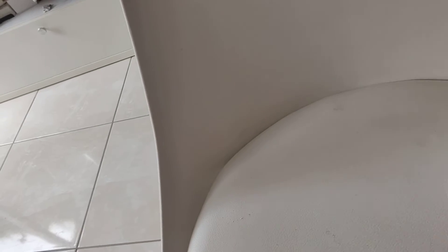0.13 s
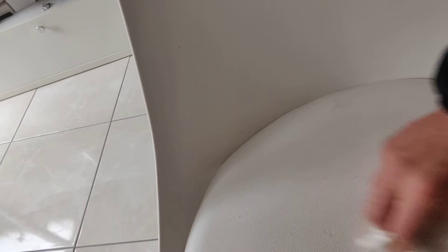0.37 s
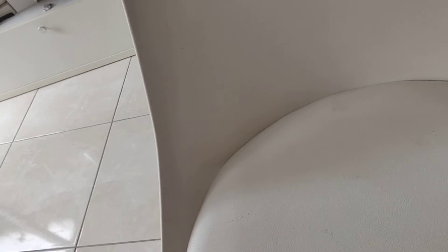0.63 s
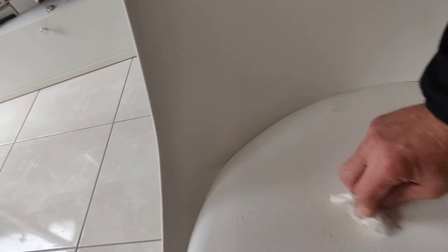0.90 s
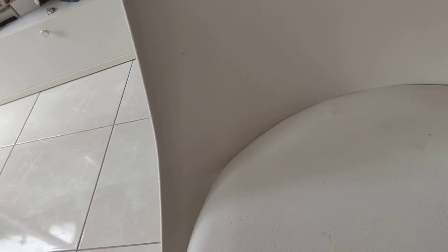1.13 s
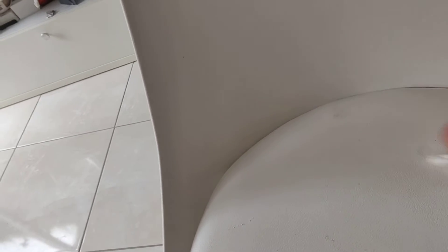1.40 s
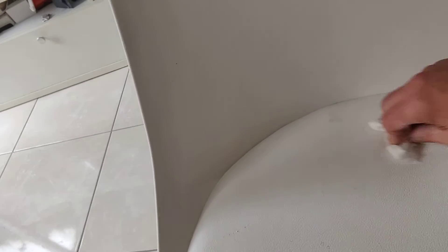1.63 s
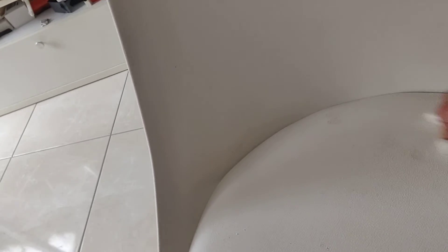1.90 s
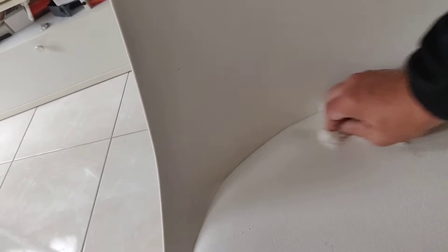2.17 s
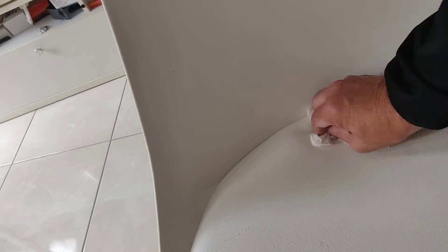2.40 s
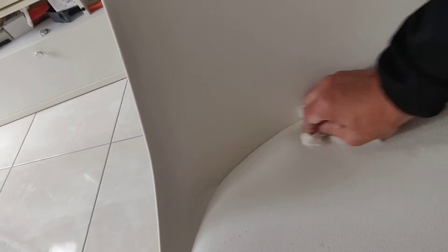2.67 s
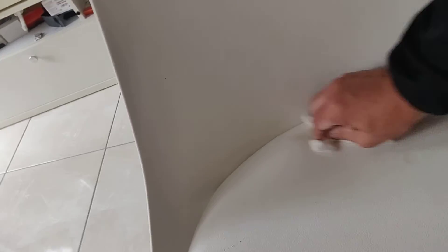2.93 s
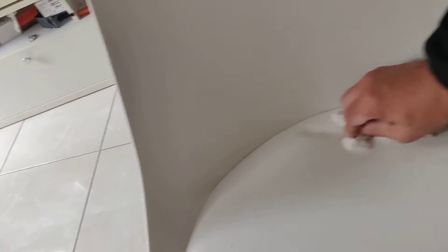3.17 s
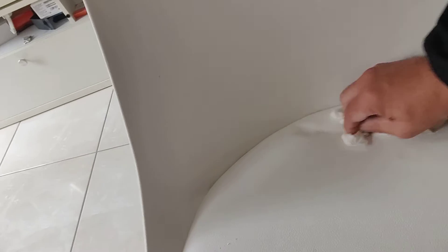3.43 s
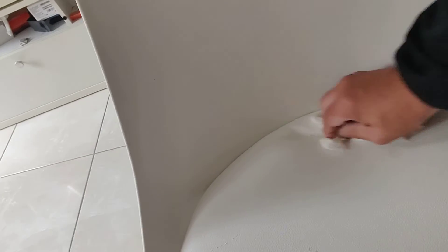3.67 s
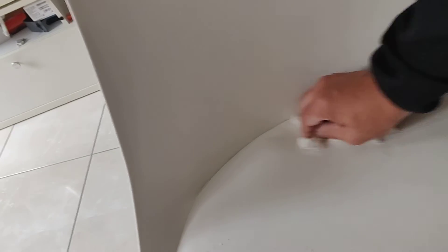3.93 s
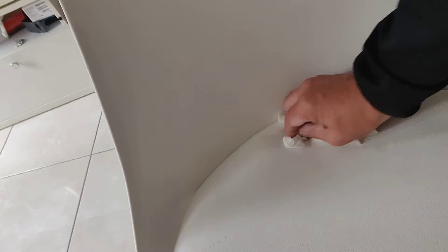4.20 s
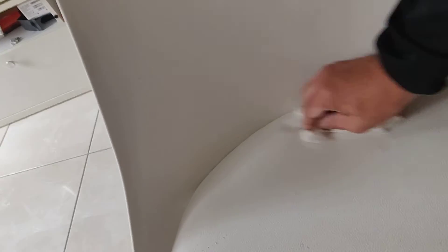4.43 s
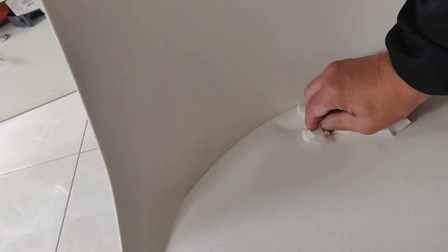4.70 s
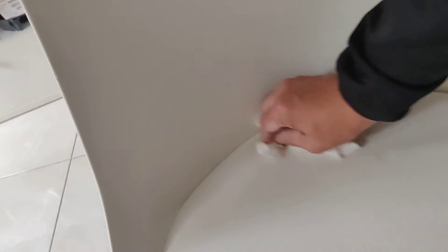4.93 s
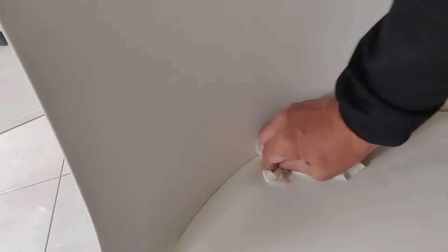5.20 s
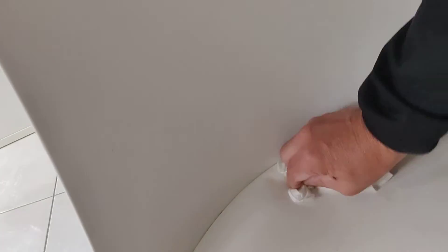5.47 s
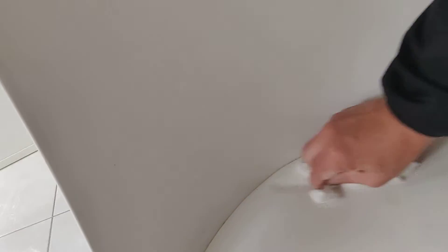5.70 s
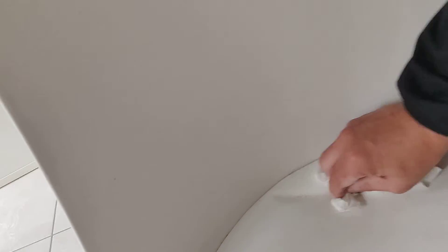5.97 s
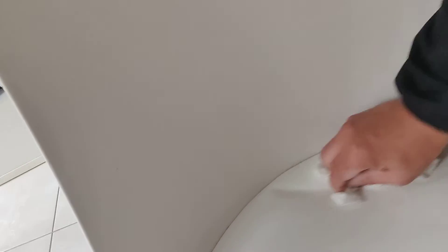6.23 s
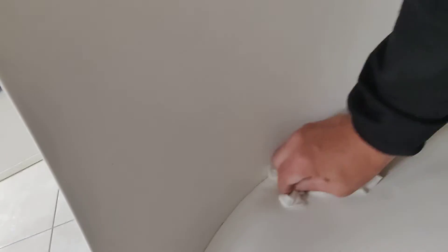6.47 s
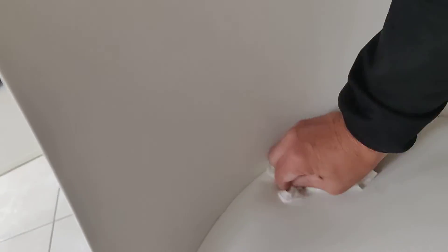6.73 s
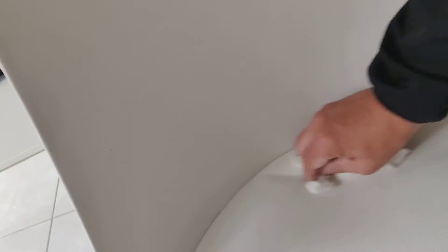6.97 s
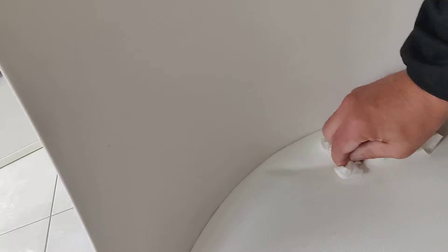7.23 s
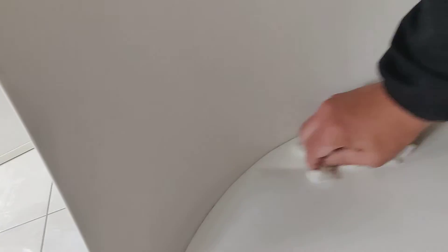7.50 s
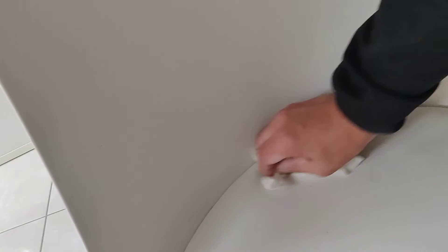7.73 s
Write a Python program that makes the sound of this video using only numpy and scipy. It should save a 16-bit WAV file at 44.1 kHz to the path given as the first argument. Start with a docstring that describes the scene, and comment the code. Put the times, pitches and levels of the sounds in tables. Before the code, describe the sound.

A cloth scrubs quickly back and forth over a padded chair seat, rasping and hissing, while the chair knocks and rattles in a tiled room.

```python
"""In a tiled room, a cloth is scrubbed to and fro over a padded chair seat, close to a two-port microphone.
Each stroke swells and dies with the speed of the hand: grainy rasp and fine hiss are shaped noise.
The chair shakes and knocks in decaying sine modes, the cloth snags in bursts of clicks, and it squeaks at the end.
The hand works its way from the open seat into the crease by the backrest; tiles echo and a faint room tone lies below."""
import sys
import numpy as np
from scipy import signal
from scipy.io import wavfile
from scipy.ndimage import uniform_filter1d

SR = 44100
rng = np.random.default_rng(int(sys.argv[2]) if len(sys.argv) > 2 else 0)


def boost(x):
    """Linear amplitude factor 10**(x/20) for a level x in decibels (scalar or array-like)."""
    u = np.asarray(x, float) / 20
    return 10 ** u


def transcribe(signal):
    """Save signal, clipped to [-1, 1], as a 16-bit WAV file at the path in sys.argv[1]."""
    frames = np.atleast_2d(signal).T
    limited = np.clip(frames, -1, 1)
    pcm = np.round(limited * 32767).astype(np.int16)
    wavfile.write(sys.argv[1], SR, pcm)


N = 347022  # length in samples

# Strokes, push and pull in turn. Each row: start in seconds, fastest moment in seconds, rasp level in dB,
# level of the shaking chair in dB.
STROKES = [(-0.01, -0, -33, -44.5), (0.144, 0.325, -44.5, -80), (0.403, 0.498, -39.5, -56),
           (0.588, 0.778, -45, -72), (0.85, 0.977, -36, -72), (1.039, 1.206, -42, -56),
           (1.26, 1.37, -36, -43), (1.459, 1.601, -46, -63), (1.665, 1.74, -39.5, -42.5),
           (1.822, 1.962, -45.5, -40), (1.975, 2.136, -40, -43), (2.256, 2.349, -40, -40),
           (2.427, 2.551, -33, -42.5), (2.599, 2.635, -44.5, -38), (2.753, 2.845, -33.5, -41),
           (2.886, 2.943, -37.5, -37), (3.026, 3.134, -34.5, -26), (3.141, 3.232, -37.5, -48),
           (3.322, 3.419, -34, -31), (3.46, 3.518, -38, -51), (3.616, 3.709, -33.5, -27),
           (3.757, 3.814, -38.5, -32), (3.928, 4.017, -29.5, -30.5), (4.07, 4.105, -36.5, -32),
           (4.215, 4.321, -30, -29.5), (4.377, 4.402, -35, -37.5), (4.53, 4.663, -33.5, -44),
           (4.707, 4.78, -46, -46), (4.886, 4.983, -38.5, -35.5), (5.04, 5.16, -40.5, -48),
           (5.225, 5.315, -31.5, -38), (5.361, 5.438, -37, -46), (5.532, 5.639, -30.5, -39),
           (5.67, 5.71, -40.5, -42.5), (5.837, 5.932, -33.5, -42), (5.992, 6.023, -39, -57),
           (6.139, 6.25, -31.5, -45), (6.312, 6.349, -33.5, -43), (6.465, 6.577, -31.5, -46.5),
           (6.638, 6.67, -35, -39.5), (6.788, 6.882, -26, -41), (6.92, 6.984, -32, -40.5),
           (7.086, 7.194, -28.5, -39.5), (7.246, 7.291, -36.5, -58), (7.414, 7.545, -35.5, -49),
           (7.568, 7.685, -41, -60), (7.758, 7.84, -42, -36)]
# Knocks of the rocking chair. Each row: start in seconds, level of the middle modes in dB,
# low modes over that in dB, high modes over that in dB.
KNOCKS = [(0.177, -22.5, -19, -38), (0.432, -32.5, 6, 1.5), (0.464, -35, -15, -10.5),
          (0.622, -24.5, -20, -32), (0.892, -32, 6, 1.5), (0.934, -39, -7, -9), (1.071, -23.5, -6.5, -26),
          (1.298, -27, 3.5, 2), (1.344, -37.5, 0, 1), (1.474, -28, -3, -16), (1.691, -29, 3, 1.5),
          (1.847, -23.5, -14, -40), (2.036, -27.5, 2.5, 1), (2.27, -26.5, -6.5, -41),
          (2.302, -26, 0.5, -23), (2.411, -39.5, -5, -18), (2.618, -33.5, 2, -27),
          (2.641, -24.5, 1.5, -12.5), (2.902, -27.5, -9.5, -32), (2.933, -23.5, 0.5, -25),
          (3.039, -30.5, 1, 0), (3.195, -30, -0.5, -16), (3.22, -22, 1, -9.5), (3.335, -26, -3.5, -3),
          (3.477, -31, 1, -15), (3.508, -31.5, 5.5, -23), (3.58, -44.5, -6, 5), (3.621, -30.5, 2.5, 6),
          (3.778, -35.5, 6, -6), (3.8, -18.5, 0, -5), (3.923, -28, 4, 5.5), (4.076, -36.5, 8, -10),
          (4.116, -19.5, -5.5, -13), (4.225, -26, 1, 5.5), (4.321, -22.5, -12, -8.5), (4.372, -36, 6, -24),
          (4.414, -28.5, 6.5, -8.5), (4.544, -25.5, 0, 2), (4.737, -45, 7, -24), (4.775, -48, 13, -7),
          (4.826, -53, 11, -10), (4.901, -35, 1.5, 0), (5.008, -44.5, 9.5, -6), (5.071, -36, 1.5, -41),
          (5.235, -35, 8, 5.5), (5.392, -36.5, 0.5, -27), (5.417, -49, 13, -9), (5.532, -42.5, 4.5, -2.5),
          (5.686, -34, -3, -13), (5.71, -34, 6.5, -10), (5.838, -33.5, 4, 4.5), (5.997, -47.5, 9.5, -22),
          (6.021, -45.5, 8.5, -10), (6.151, -32, 3, 1), (6.307, -48.5, 9, -14), (6.335, -43, 12.5, 5),
          (6.483, -33.5, 1.5, 1.5), (6.644, -48.5, 9.5, -9), (6.668, -44, 9, 8.5),
          (6.736, -25.5, -29, -15.5), (6.792, -31, -3, -3), (6.964, -39.5, 7, -1.5), (7.1, -32, -0.5, 5),
          (7.424, -52.5, 6, -18), (7.6, -42, 1, -15), (7.63, -45.5, 8, 1), (7.766, -61, 8, 5),
          (7.81, -51, 13, 0), (7.843, -49, 2, 9)]
# Snags of the cloth. Each row: start in seconds, click level in dB, thud over the click in dB,
# length in ms (the time by which the slips have sunk 9 dB).
SNAGS = [(2.558, -18, -18, 1.6), (2.853, -17, -24, 1), (3.426, -19, -17, 1.1), (3.719, -15.5, 4, 2.1),
         (4.023, -26, 7, 1.2), (4.324, -7, -22, 2.3), (4.668, -12.5, -15, 1.1), (5.626, -6.5, -11, 10.3),
         (6.258, -26.5, -5, 2.2), (6.587, -13, -9, 2.1), (6.888, -18.5, 3.5, 4), (7.194, -17.5, -6, 9.6),
         (7.555, -30.5, 6, 2)]
# Modes of the chair when free to ring. Each row: frequency in Hz, relative level in dB, t60 in seconds.
LOW_MODES = [(90.7, -9.5, 0.28), (120, -7, 0.15), (155.9, 2.5, 0.084)]
MIDDLE_MODES = [(234.15, 4.42, 0.38), (266.5, 1.3, 0.19)]
HIGH_MODES = [(380.7, 10, 0.036), (531.6, 4.5, 0.045), (566, -2, 0.14), (705, -29, 0.011), (910, -8, 0.028)]
# Colour of the rasp, on the open seat and by the backrest. Each row: frequency in Hz, relative level in dB.
OPEN_RASP = [(180, -60), (300, -27), (508, -12.5), (871, -7), (1190, -11.5), (1300, -10), (2290, -10),
             (3500, -29.5), (6000, -19.5), (7800, -59), (13200, -120)]
CREASE_RASP = [(180, -18), (300, -1), (376, -2), (598, -2), (1100, -12), (1270, -5), (1940, -13.5),
               (2460, -8), (3130, -20.5), (4170, -20), (4670, -30.5), (5430, -39), (6000, -27), (7800, -70),
               (13200, -120)]
# Colour of the hiss. Each row: frequency in Hz, relative level in dB.
HISS = [(2650, -6), (4500, -8.5), (5330, -11), (5730, -7), (6350, -6), (7360, -2), (8500, -14), (9920, -19),
        (11000, -17.5), (14900, -15), (15300, -47)]
# Hiss of a push with usual rasp. Each row: time in seconds, level in dB.
HISS_LEVEL = [(0, -44.5), (.6, -45), (1.5, -46.5), (2.0, -50.5), (2.5, -45.5), (3.5, -50), (4.5, -53),
              (5.0, -53.5), (5.4, -50.5), (5.7, -53.5), (6.5, -52), (7.2, -54), (7.87, -53)]
# The hand moves about the microphone. Each row: time in seconds, hiss left over right in dB,
# rasp left over right in dB (both pans are centred on their mean), lift of the top of the hiss in dB.
PLACE = [(0.0, 0.5, 0.5, -5.5), (0.81, -2.5, 0.5, -5), (1.64, -4, 2, -4.5), (2.04, -1, -1, -4),
         (3.55, 5, 2.5, -5.8), (4.51, 2.5, 2.5, -3.5), (5.26, 11, 5, -3.5), (5.83, 6, 3, -6),
         (6.11, 5, 3, -4.5), (6.66, 10, 4, -7.5), (7.87, 4.5, -2.0, -2.5)]
# Colour of the room tone. Each row: frequency in Hz, relative level in dB.
ROOM = [(15, -79), (25, -16), (69, -6), (178, -26), (239, -1.5), (329, -12), (1230, -29), (2340, -26),
        (4710, -36.5), (7230, -34), (11100, -54), (13400, -45), (15300, -64)]
# Likeness of the two ports. Each row: frequency in Hz, left-right correlation from 0 to 1.
SAME = [(60, 0.96), (400, 1), (700, 0.95), (1000, 0.2), (1300, 0.54), (2400, 0.75), (4000, 0.08),
        (9000, 0.054), (15000, 0.27)]
# Balance of the ports. Each row: frequency in Hz, left over right on the open seat in dB, and in the crease in dB.
LEAN = [(100, 0.5, .5), (453, 3.5, 2), (900, 1, 4), (1290, 2, 3), (2270, -10.5, -8), (2910, -8, -4),
        (3330, 4.5, -1), (5000, 3, 2.5), (6430, -1.5, -2), (7340, 4.5, 7), (8350, 11.5, 13.5),
        (10460, 4, 3), (14000, -2, -4)]
# Phase lead of the left port. Each row: frequency in Hz, lead on the open seat in radians, and in the crease in radians.
LEAD = [(600, 0.3, 0.077), (826, 1, 1.46), (1004, -0.25, 1.7), (1424, -2, 3.15), (1920, -4.5, 7.8),
        (2610, -2, 7.94), (4020, -0.5, 7.3), (5730, 4, 10.2)]
# Echo decay of the tiles. Each row: frequency in Hz, t60 in seconds.
TILES = [(200, 0.057), (1000, 0.48), (4000, 0.25), (10000, 0.31)]
# Rough squeak of the dragging cloth. Each row: time in seconds, mean pitch in Hz, mean level in dB.
SQUEAK = [(7.75, 473, -58), (7.78, 509, -43.5), (7.8, 509, -52), (7.82, 561, -33), (7.87, 622, -36)]

INTO_CREASE_S = (1.73, 2.36)  # the hand leaves the open seat, and reaches the crease


def evened(x):
    """Scales to rms 1."""
    return x / np.sqrt(np.mean(x ** 2) + 1e-20)


def read(points, hz, column=1):
    """Reads a spectrum on a log-frequency axis."""
    table = np.transpose(points)
    return np.interp(np.log(hz + 1), np.log(table[0] + 1), table[column])


def add(mix, s, sound):
    """Mixes a sound in at s seconds."""
    part = mix[..., round(s * SR):][..., :sound.shape[-1]]
    part += sound[..., :part.shape[-1]]


def by_place(open_seat, crease, t):
    """Blends two settings as the hand moves from the open seat into the crease."""
    share = np.interp(t, INTO_CREASE_S, [0, 1])
    return (1 - share) * open_seat + share * crease


def noise(shape_db, patchy_db, size=512):
    """Two-port noise with drifting patches; shape_db(hz, t) colours it."""
    hop, bins = size // 4, size // 2 + 1
    frames, hz = N // hop + 5, np.fft.rfftfreq(size, 1 / SR)[:, None]
    t = np.arange(frames) * hop / SR
    a, b, c, d, patches = rng.standard_normal((frames, bins, 5)).T
    patches = uniform_filter1d(patches, size=size // 256, axis=0)
    patches = evened(uniform_filter1d(patches, size=9000 // size, axis=1))
    # the right port shares part of the left one's noise, with a phase lag
    same = np.clip(read(SAME, hz), -1, 1)
    left = a + 1j * b
    right = same * left + np.sqrt(1 - same ** 2) * (c + 1j * d)
    lead = by_place(read(LEAD, hz), read(LEAD, hz, column=2), t)
    z = np.array([left, right * np.exp(-1j * lead)])
    lean_db = by_place(read(LEAN, hz), read(LEAN, hz, column=2), t)
    ports_db = np.array([.5, -.5])[:, None, None] * lean_db
    z *= boost(shape_db(hz, t) + ports_db + patchy_db * patches)
    return evened(signal.istft(z, nperseg=size, noverlap=size - hop)[1][:, :N])


def ring(modes, length=0.87, rise_ms=0.057, chance=np.zeros((5, 2))):
    """Decaying sines, one a mode: length scales the t60, rise_ms swells them in, chance shifts pitch and phase."""
    detune = 0.018  # greatest pitch shift, as a share
    t = np.arange(SR // 3) / SR
    swell = 1 - np.exp(-(t * 1000 / rise_ms) ** 2)
    out = np.zeros(len(t))
    for (hz, db, t60), (bend, turn) in zip(modes, chance):
        sine = np.sin(2 * np.pi * (hz * (1 + 2 * detune * bend) * t + turn))
        out += boost(db - 60 * t / (t60 * length)) * sine
    return swell * out


def room_tone():
    """Steady, quiet noise of the room in its own colour."""
    return boost(-48.5) * noise(lambda hz, t: read(ROOM, hz), patchy_db=2.2, size=2048)


def tiled_room(x):
    """Sparse echoes of random sign, each band dying at its own speed."""
    taps = np.zeros((2, SR // 2))
    at = np.arange(300, SR // 2 - 20, 20) + rng.integers(0, 20, (2, (SR // 2 - 301) // 20))
    np.put_along_axis(taps, at, rng.choice([-1., 1.], at.shape), 1)
    hz, t, z = signal.stft(taps, SR, nperseg=256)
    fading = z * boost(-60 * t / read(TILES, hz)[:, None])
    tail = signal.istft(fading, SR, nperseg=256)[1]
    return signal.fftconvolve(x.mean(0)[None], tail / np.linalg.norm(tail[0]), axes=1)[:, :N]


def squeak():
    """Uneven stick-slip: a jittered pitch with a few overtones."""
    s, hz, db = np.transpose(SQUEAK)
    t, out = np.arange(s[0], N / SR, 1 / SR), np.zeros(N)
    jitter, flutter = evened(uniform_filter1d(rng.standard_normal((len(t), 2)), size=120, axis=0)).T
    turns = np.cumsum(np.interp(t, s, hz) * (1 + 0.0574 * jitter)) / SR
    tone = sum(boost(part_db) * np.sin(2 * np.pi * k * turns) for k, part_db in ((1, 3), (2, -6), (4, -16)))
    add(out, s[0], tone * boost(np.interp(t, s, db) + 1.9 * flutter))
    return out


def snags():
    """The cloth catches and lets go in six quick slips: uneven clicks with a crackle of fibres and a high-mode thud."""
    slip_ms, click_ms = 2.05, 0.16  # spacing of the slips, rise of a click
    t = np.arange(200) * 1000 / SR / click_ms
    click = t * np.exp(1 - t) - 0.067 * t * np.exp(-t / 16.5)
    thud, out = ring(HIGH_MODES, 0.062), np.zeros((2, N))
    thud = thud[None] / abs(thud).max()
    crackles = rng.standard_normal((len(SNAGS), 6, 2, len(t))) * np.exp(-t / 14) * boost(-5.5)
    ports = boost(np.array([[1.5], [-1.5]]))
    for (s, db, thud_db, ms), chance, crackle in zip(SNAGS, rng.random((len(SNAGS), 6, 2)), crackles):
        for k, (size, late) in enumerate(chance):
            slip_db = db - 9 * (k * slip_ms / ms) ** 4 - 4 * size
            at = s + (k + 0.27 * late) * slip_ms / 1000
            add(out, at, boost(slip_db) * (click + crackle[k]) * ports)
            add(out, at, boost(slip_db + thud_db) * thud)
    # soft cloth dulls the clicks
    return signal.sosfilt(signal.butter(3, [270, 3000], "band", fs=SR, output="sos"), out)


def knocks():
    """Each knock swells into the chair's modes; the joint bounces once quickly, and the seat settles a little later."""
    out = np.zeros(N)
    for (s, db, low_db, high_db), chance in zip(KNOCKS, rng.random((len(KNOCKS), 4, 5, 2)) - .5):
        length = by_place(0.68, 0.66, s)  # share of the free ring that the hand's weight allows
        rise_ms = by_place(1.48, 1.85, s)
        low = boost(low_db) * ring(LOW_MODES, length, rise_ms, chance[0])
        high = boost(high_db) * ring(HIGH_MODES, 0.61, 1.26 * rise_ms, chance[1])
        hard = low + high
        add(hard, 0.00576, boost(6) * hard.copy())  # the bounce, stronger than the first hit
        # pressing into the crease damps the middle modes and their later settling
        length *= by_place(0.93, 0.67, s)
        # on the open seat, knocks short of high modes lose the upper middle mode
        upper_db = by_place(0.28, 0, s) * min(high_db, 0)
        modes = np.add(MIDDLE_MODES, [(0, 0, 0.0032), (0, upper_db, 0.0025)])
        soft_rise_ms = 0.95 * rise_ms * (1 + 0.016 * max(-high_db, 0))  # such knocks also rise slower
        middle = ring(modes, length, soft_rise_ms, chance[2])
        add(out, s, boost(db) * (middle + hard))
        settle_s = 0.02589 + 0.0156 * chance[3, 4, 0]
        settle_db = db - 12.5 + by_place(0, -4, s)
        add(out, s + settle_s, boost(settle_db) * ring(MIDDLE_MODES, length, 0.57 * rise_ms, chance[3]))
    return out


def hollow_hz(t):
    """Pitch of the hollow under the cupped hand: highest just after a push starts, lowest as it ends."""
    start = np.transpose(STROKES)[0]
    lag_s = np.resize([0.068, -0.024], len(start))  # push, pull
    pitch_hz = np.resize([1280, 687], len(start))
    return np.interp(t, start + lag_s, pitch_hz)


def cupped(hz, t):
    """Rasp colour; on the open seat the hollow hand adds a moving resonance and an overtone."""
    centre_hz = hollow_hz(t)
    width = 0.13  # in log frequency
    hollow_db = sum(lift_db * np.exp(-(np.log((hz + 1) / (k * centre_hz)) / width) ** 2)
                    for k, lift_db in ((1, 11), (1.94, 3)))
    return by_place(read(OPEN_RASP, hz) + hollow_db, read(CREASE_RASP, hz), t)


def fibres(per_s, spread_db):
    """Grain of many tiny catches: a bumpy gain shared by both ports."""
    catches = (rng.random(N) < per_s / SR) * boost(spread_db * np.minimum(rng.exponential(1, N), 4))
    return evened(0.85 + signal.oaconvolve(catches, np.exp(-np.arange(400) / 260.0))[:N])


def panned(column):
    """Slow left-right gains as the hand changes place."""
    s, pan_db = np.transpose(PLACE)[[0, column]]
    return boost(np.outer([.5, -.5], np.interp(np.arange(N) / SR, s, pan_db - pan_db.mean())))


def effort(levels_db, bend, crease_bend, halts=True):
    """Level of one layer: it follows hand speed, which rises to its fastest and falls to rest in each stroke."""
    t = np.arange(N) / SR
    bend = by_place(bend, crease_bend, t)
    start, fastest = np.transpose(STROKES)[:2]
    push = np.resize([True, False], len(start))
    # each stroke runs a little into the next
    stop = np.append(start[1:], 7.9) + np.where(push, 0.016, 0.004)
    # in the crease a push jams against the backrest just after its fastest
    jammed = push & (start > INTO_CREASE_S[1]) & halts
    stop[jammed] = fastest[jammed] + 0.03
    power = np.zeros(N)
    for db, *times in zip(levels_db, start, fastest, stop):
        speed = np.interp(t, np.sort(times), [0, 1, 0], 0, 0)
        curve = bend * np.where(t > times[1], 0.84, 1)  # the fall is more abrupt than the rise
        power += (boost(db) * speed ** curve) ** 2
    return np.sqrt(uniform_filter1d(power, size=200).clip(0))


def scrubbing():
    """Cloth on the seat cover: a grainy rasp, a fine hiss, and the chair shaken into its modes."""
    s, top_db = np.transpose(PLACE)[[0, 3]]
    _, fastest, rasp_db, shaking_db = np.transpose(STROKES)
    # hiss follows the rasp by 0.52 dB per dB about its usual -37 dB; pulls hiss 3 dB more than pushes
    hiss_db = np.interp(fastest, *np.transpose(HISS_LEVEL)) + 0.52 * (rasp_db + 37)
    hiss_db = hiss_db + np.resize([0, 3], len(STROKES))

    def hiss_colour(hz, t):
        """Hiss spectrum, with its top moving as the hand changes place."""
        return read(HISS, hz) + (hz > 10500) * np.interp(t, s, top_db)

    rasp = noise(cupped, patchy_db=4.0) * fibres(per_s=3800.0, spread_db=-2.5)
    rasp = rasp * effort(rasp_db, bend=1.0, crease_bend=1.585) * panned(column=2)
    hiss = noise(hiss_colour, patchy_db=3.5) * fibres(per_s=1500., spread_db=-1.0)
    hiss = hiss * effort(hiss_db, bend=1.0, crease_bend=1.0) * panned(column=1)
    judder = rng.standard_normal(N) * fibres(per_s=200., spread_db=3.5)
    judder = judder * effort(shaking_db, bend=0.67, crease_bend=0.79, halts=False)
    body = ring(LOW_MODES, 0.66, 1.38) * boost(2) + ring(MIDDLE_MODES, 0.22) + ring(HIGH_MODES, 0.59) * boost(-8.0)
    shaking = signal.oaconvolve(judder, body / np.linalg.norm(body))[:N]
    return rasp + hiss + shaking


def scene():
    """The chair and cloth, their echoes off the tiles, and the quiet room tone."""
    ports = boost(np.array([[.3], [-.3]]))
    near = scrubbing() + snags() + (squeak() + knocks()) * ports
    return near + boost(-13) * tiled_room(near) + room_tone()


def top_cut(x):
    """Nothing passes above the cut-off."""
    return signal.sosfilt(signal.butter(12, 15490, fs=SR, output="sos"), x)


def record(dry):
    """The microphone cuts the deep bass, below 50 Hz."""
    cut = signal.sosfilt(signal.butter(4, 50, "high", fs=SR, output="sos"), dry)
    return top_cut(cut)


dry = scene()
out = record(dry)
transcribe(out)
```